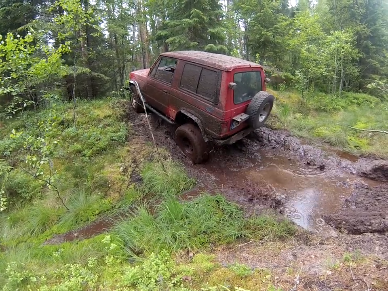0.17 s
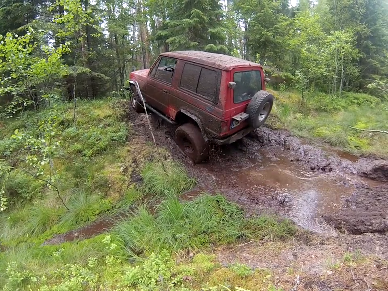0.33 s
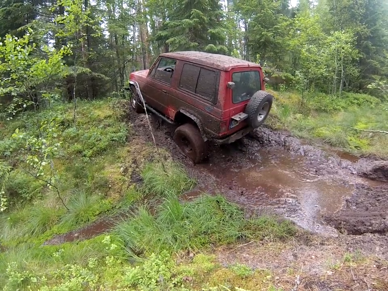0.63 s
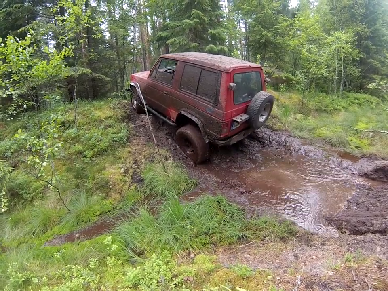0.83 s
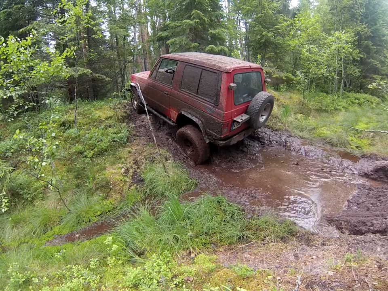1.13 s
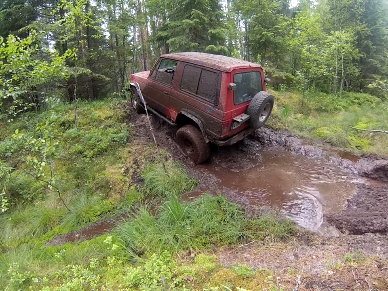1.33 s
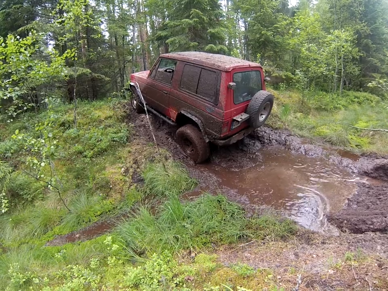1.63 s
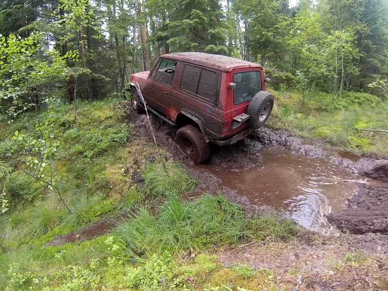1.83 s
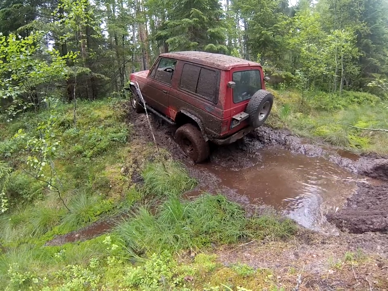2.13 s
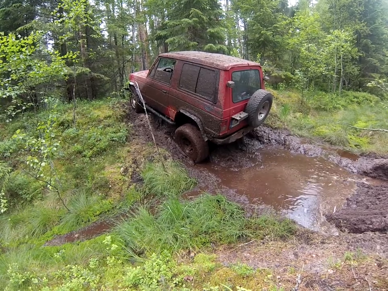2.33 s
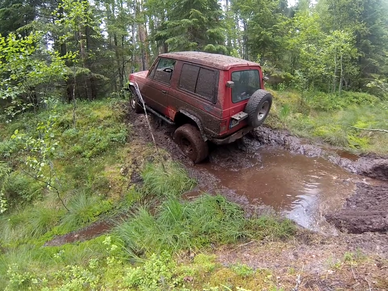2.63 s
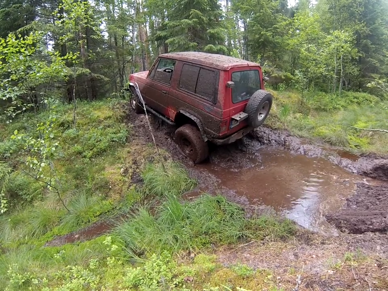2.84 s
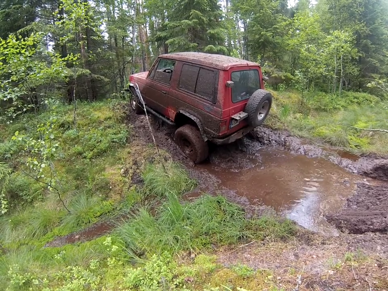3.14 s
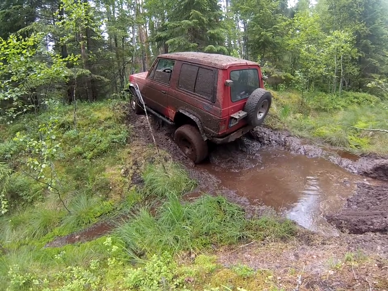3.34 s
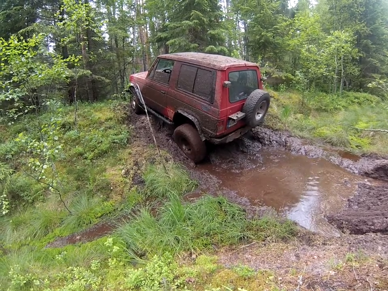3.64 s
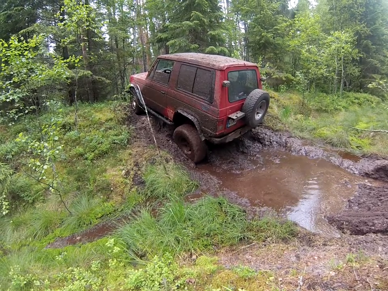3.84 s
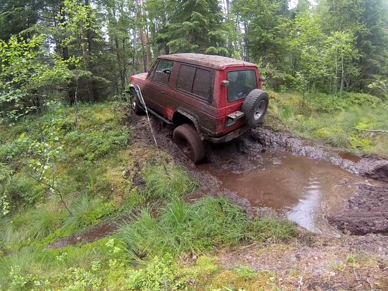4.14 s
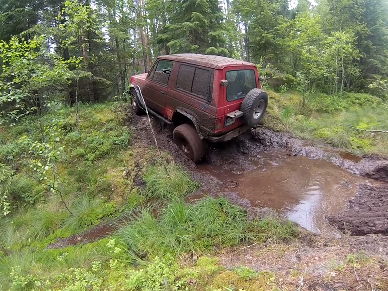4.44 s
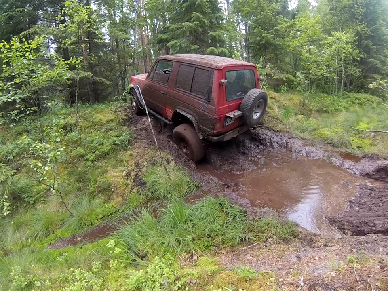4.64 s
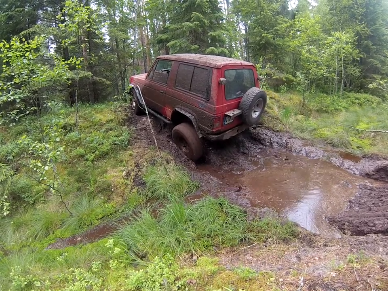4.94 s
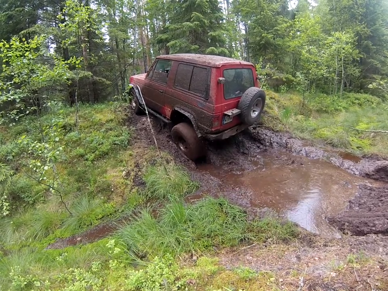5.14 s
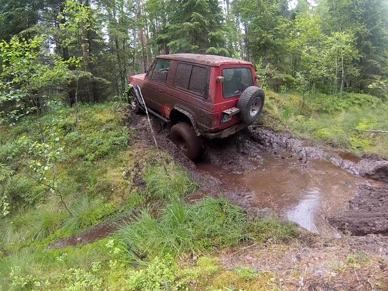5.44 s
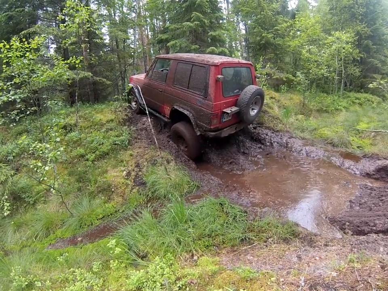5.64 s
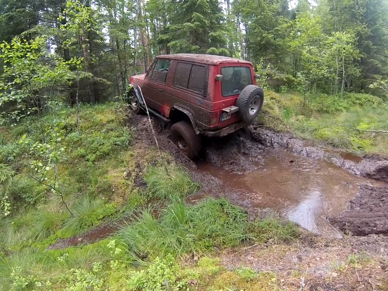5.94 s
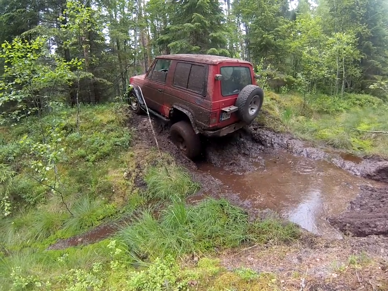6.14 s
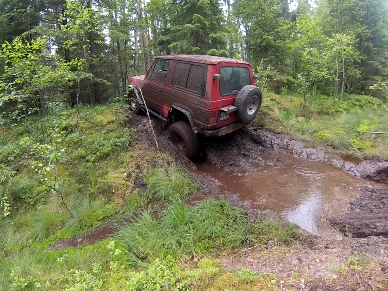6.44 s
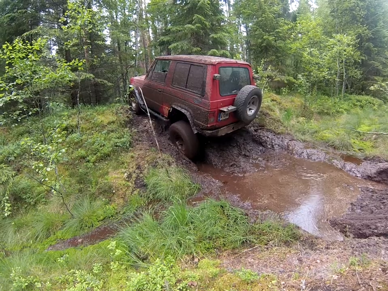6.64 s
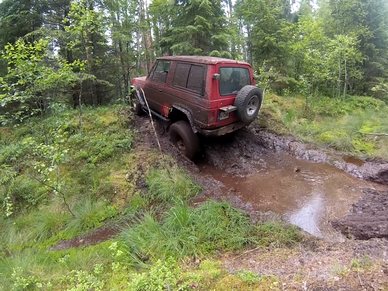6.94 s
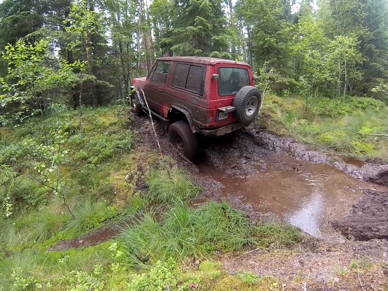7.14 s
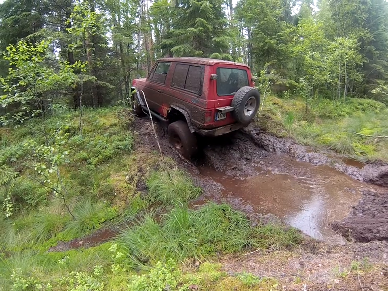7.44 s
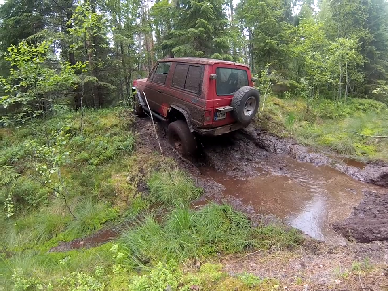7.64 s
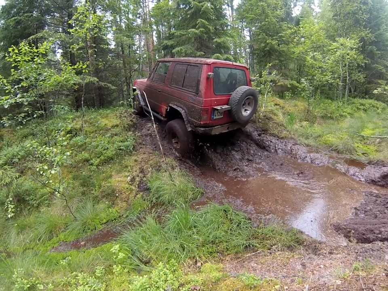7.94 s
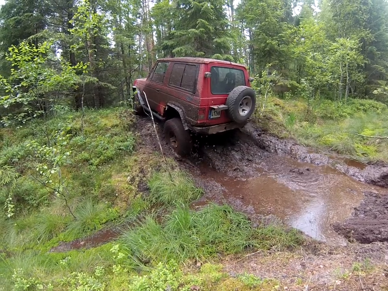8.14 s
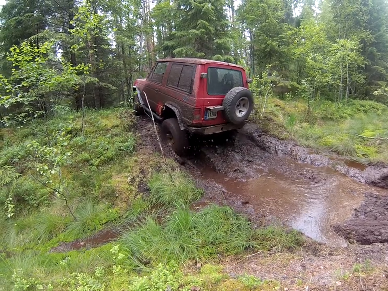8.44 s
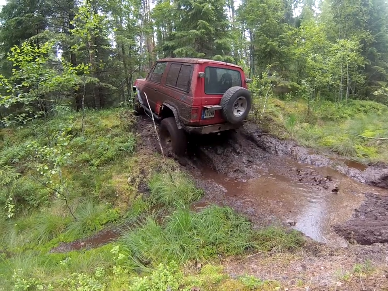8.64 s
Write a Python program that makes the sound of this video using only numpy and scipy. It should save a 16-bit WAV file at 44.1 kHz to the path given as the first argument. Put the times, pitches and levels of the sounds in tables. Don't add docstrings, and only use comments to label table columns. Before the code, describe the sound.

A four-wheel-drive a few metres away struggles in a forest mud hole. Its engine surges with a raspy exhaust, then bogs down almost to a stall while clods plop and grit ticks on panels. It picks up again, labours steadily, pops in the tail pipe as more mud lands, then revs fastest at the end. Light wind thumps the single microphone over faint leaf hiss.

```python
import sys
import numpy as np
from scipy import signal
from scipy.fft import rfft, irfft
from scipy.io import wavfile
from scipy.ndimage import uniform_filter1d

SR = 44100
rng = np.random.default_rng(int(sys.argv[2]) if len(sys.argv) > 2 else 0)


def ratio_of_db(decibels):
    return 10 ** (np.asarray(decibels, float) / 20)


def digitize_waveform(pressure):
    field = np.atleast_2d(pressure).T
    bounded = np.clip(field, -1, 1)
    quanta = np.round(bounded * 32767).astype(np.int16)
    wavfile.write(sys.argv[1], SR, quanta)


N = 387192

# frequency_hz, density_db (per Hz)
FOREST_SPECTRUM = [(140, -28), (230, -3), (769, -13.5), (1070, -14.5), (2080, -18), (2440, -16.5),
                   (3230, -21), (5850, -23.5), (15000, -31.5)]
FOREST_DB = -65
WHINE_HZ, WHINE_DB = 12330, -88

# frequency_hz, density_db (per Hz)
GUST_SPECTRUM = [(3, 6), (8, -1.5), (16, 1), (27, -5.5), (40, -9.5), (70, -10), (120, -20), (300, -54)]
# time_s, level_db
WIND_LEVEL = [(0, -42.5), (.9, -45), (1.2, -45), (1.9, -44), (2.15, -45.5), (2.8, -46.5), (3.1, -46.5),
              (8.3, -43.5), (8.78, -50)]
# time_s, peak_db, pitch_hz, way (+1 suction first, -1 push first)
WIND_THUMPS = [
    (1.109, -34.5, 72, 1),
    (1.591, -55, 64, 1),
    (1.089, -34, 29, 1),
    (1.616, -32, 42, -1),
    (1.932, -37, 39, -1),
    (2.449, -39, 22, 1),
    (3.799, -34, 55, 1),
    (4.29, -37, 27, -1),
    (4.866, -34, 43, -1),
]
BREEZE_DB, BUFFET_HZ, BUFFET_FOLLOWS = -45, 55, 2.5

# time_s, peak_db, pitch_hz, t60_s
MUD_CLODS = [(1.308, -34.5, 270, 0.026), (1.309, -56, 900, 0.017), (1.411, -50.5, 745, 0.021),
             (1.478, -49.5, 700, 0.016), (1.512, -57, 5600, 0.013), (1.572, -64, 5900, .03),
             (1.608, -60, 782, 0.025), (2.021, -41, 812, 0.017), (2.330, -64, 2450, 0.027),
             (2.597, -65, 2260, 0.037), (2.625, -64, 2400, 0.028), (2.640, -66, 2250, 0.055),
             (6.035, -37.5, 570, .015), (6.057, -41, 530, 0.013)]
# time_s, peak_db, t60_s
GRIT_TICKS = [
    (1.512, -60, .02),
    (2.020, -36, 0.058),
    (2.277, -57, 0.039),
    (2.557, -50, 0.032),
    (2.597, -49, 0.032),
    (2.625, -53, .04),
]
# frequency_hz, width_hz, level_db
PANEL_MODES = [(560, 200, -14), (810, 200, -2), (1650, 220, -6.5), (2400, 170, 0), (3740, 620, -13),
               (4540, 580, -11), (6560, 1200, -15.5), (8870, 3700, -22)]

# time_s, firing_rate (firings per s)
ENGINE_SPEED = [(.17, 70), (.74, 88), (1.75, 42), (2.2, 29), (2.83, 23), (3.1, 52), (3.42, 65),
                (3.85, 62.5), (4.3, 71), (5.33, 71.5), (5.6, 62), (5.97, 61), (6.72, 77), (7.1, 67),
                (7.75, 88.5), (8.1, 107), (8.32, 97), (8.5, 80.5)]
# time_s, level_db
THROTTLE_HISS = [(0, -58), (.18, -51.5), (.45, -49.5), (.65, -55), (.73, -64), (1.6, -78.5), (2.82, -82.5),
                 (3.02, -64.5), (3.5, -55.5), (4.2, -53), (5.6, -57), (6.6, -55), (6.95, -58), (7.2, -51.5),
                 (8.04, -43.5), (8.22, -56.5), (8.5, -59.5), (8.64, -51.5)]
# time_s, level_db
PULSE_PRESSURE = [(0, -5.5), (.3, 2.5), (.66, 0.5), (.79, -23), (.88, 13.5), (1.1, -14.5), (1.6, -6),
                  (2.4, -29), (2.72, -28), (2.84, -1), (3.9, 0), (4.6, -4), (6.3, -0.5), (6.92, -2.5),
                  (7.5, 1.5), (8.25, 10.5), (8.5, -11), (8.63, 1.5)]
# time_s, strain_db
WHEEL_STRAIN = [(0, 0.5), (.5, -1.5), (.85, 2.5), (2.92, 2), (3.5, -3), (5.0, 2.5), (5.6, 0.5), (6.75, 2.5),
                (7.2, -2.5), (8.25, 0.5)]
# time_s, length_s, rise_db
TYRE_BITES = [(.38, 0.18, 4), (0.683, 0.064, 4.5), (0.917, 0.098, 13), (1.363, 0.23, 9.5),
              (3.014, 0.079, 2), (4.188, 0.071, 3.5), (5.08, 0.087, 3), (6.523, 0.12, 3.5), (6.76, 0.1, 13),
              (7.89, 0.06, 11), (8.106, .05, 12.5)]
# level_db (middle throttle), throttle_share, strain_share, bite_share
PART_LEVELS = [
    (-61.5, 0.58, 0.1, 0.66),
    (-60, 0.65, 0.11, 0.34),
    (-57.5, 0.92, 1.18, 0.1),
    (-54, 0.65, 1, 0.077),
]
CRUISE_DB, CRUISE_RATE = -56, 70
FLYWHEEL_S = .08

# frequency_hz, width_hz, level_db
DOWN_PIPE_MODES = [(495, 36, -4.5), (634, 45, 0.5), (893, 64, 1), (987, 85, -1.5), (1060, 78, -2.5)]
SING_DB, SING_RATE, SING_DB_PER_RATE, SING_FOLLOWS = -57.5, 89, 1.87, 0.72

# time_s, peak_db, pitch_hz
MISFIRES = [
    (5.996, -36, 192),
    (6.0377, -26, 234),
    (6.0593, -26, 221),
    (6.254, -33, 200),
]

# frequency_hz, width_hz, level_db
PIPE_MODES = [(398, 35.5, -2.5), (463, 48, -2.5), (607, 82, -2)]
# frequency_hz, width_hz, level_db
HEADER_MODES = [(864, 47, -6), (912, 157, -9.5), (1051, 54, -4), (1086.4, 25.3, 1), (1157, 73, -8),
                (1304, 96, -14)]
# frequency_hz, width_hz, level_db
BLOCK_MODES = [(1550, 177, -1), (1800, 115, -4), (2153, 44, 5.5), (2250, 49, 7), (2458, 360, 1.5),
               (2650, 51, -12), (2966, 51, -14), (3240, 130, -9.5)]
# frequency_hz, width_hz, level_db
JET_MODES = [(3530, 240, -8.5), (4340, 770, -6), (4680, 610, -2.5), (5600, 210, 2)]
# frequency_hz, width_hz, level_db
JET_TOP_MODES = [(6130, 55, -13.5), (6865, 286, -3), (8060, 580, -11), (9650, 180, -12), (11000, 700, -20)]
# frequency_hz, density_db (per Hz)
JET_SPECTRUM = [(5500, -46), (6300, -9), (7500, -22), (10000, -22), (15000, -26)]
# frequency_hz, width_hz, level_db
LIP_MODES = [(5300, 260, 1.5), (5970, 440, 0)]
# frequency_hz, width_hz, level_db
WHISTLE_TONES = [(5230, 130, -6), (5350, 120, -5), (5810, 220, -3), (6020, 200, 0)]
WHISTLE_DB, WHISTLE_FOLLOWS, WHISTLE_STRAIN = -2.8, .15, -.3
CLEAN_DB, CLEAN_DB_PER_RATE = -9, .38

# level_db, pressure_share, throttle_share
LOW_ORDER_LEVELS = [
    (-51.5, .15, 0.94),
    (-43, 0.82, 0.11),
    (-51.5, 0.44, .02),
    (-48.5, 0.64, .02),
]
# frequency_hz, level_db, pressure_share (small: rings on at low pressure)
LOW_PIPE_RESPONSE = [(40, -6.5, 0.77), (126, -0.5, 1.5), (140.8, -2, 0.84), (190.6, 6.5, .02),
                     (218.8, -1, 1.3), (250, -6.5, 0.87), (288.7, -3, 0.95), (344, -24.5, 0.55)]
# frequency_hz, level_db (re low orders)
TAIL_PIPE_RESPONSE = [(100, -19), (150, -19), (185, 0.5), (220, -25), (310, -18.5), (335, -36), (400, -75)]
SHUT_DB = -5
UNEVEN_DB, UNEVEN_GROWS = .6, .2


def rms_one(x):
    return x / np.sqrt(np.mean(x ** 2) + 1e-20)


def in_time(rows):
    s, *columns = np.transpose(rows)
    return [np.interp(np.arange(N) / SR, s, c) for c in columns]


def drift(rate):
    r = np.exp(-40 * np.pi * rate / SR)
    chance = rng.standard_normal(N // 20 + 2002)
    slow = signal.lfilter([1], [1, -2 * r, r * r], chance)[2000:]
    return np.interp(np.arange(N) / 20, np.arange(len(slow)), rms_one(slow))


def coloured(x, spectrum):
    hz, db = np.transpose(spectrum)
    grid = np.maximum(np.arange(N // 2 + 1) * SR / N, 1)
    gain_db = np.interp(np.log(grid), np.log(hz), db, left=-90)
    return irfft(rfft(x) * ratio_of_db(gain_db), N)


def resonances(x, modes, patchy_db=0):
    out = 0
    for k, (hz, width, db) in enumerate(modes):
        r = np.exp(-np.pi * width / SR)
        feed = (1 - r * r) / 2 * np.array([1, 0, -1])
        rung = signal.lfilter(feed, [1, -2 * r * np.cos(2 * np.pi * hz / SR), r * r], x)
        out = out + (-1) ** k * ratio_of_db(db + patchy_db * drift(2.7)) * rung
    return out


def band(x, low_hz, high_hz, order=2):
    return signal.sosfilt(signal.butter(order, [low_hz, high_hz], "band", fs=SR, output="sos"), x)


def add(out, s, db, hz, shape):
    cycle = np.arange(-1.5, 1.5, hz / SR)
    at = round(s * SR) - len(cycle) // 2
    out[at:at + len(cycle)] += ratio_of_db(db) * shape(2 * np.pi * cycle) * np.exp(-(cycle / 0.73) ** 2)


def forest():
    hiss = rms_one(coloured(rng.standard_normal(N), FOREST_SPECTRUM))
    whine = np.sin(2 * np.pi * WHINE_HZ * np.arange(N) / SR)
    return hiss * ratio_of_db(FOREST_DB + .3 * drift(40)) + ratio_of_db(WHINE_DB) * whine


def wind():
    lumps = coloured(rng.standard_normal(N), GUST_SPECTRUM) * ratio_of_db(1.9 * drift(3.9))
    level_db = in_time(WIND_LEVEL)[0]
    buffeting = band(lumps, BUFFET_HZ, 400)
    lumps = lumps + buffeting * (ratio_of_db(BUFFET_FOLLOWS * np.minimum(level_db - BREEZE_DB, 0)) - 1)
    out = ratio_of_db(level_db) * rms_one(lumps)
    for s, db, hz, way in WIND_THUMPS:
        add(out, s, db, hz, lambda turn: np.sign(way) * np.sin(turn))
    return out


def mud():
    out, grit, t = np.zeros(N), np.full(N, 1e-18), np.arange(SR // 8) / SR
    for s, db, hz, t60 in MUD_CLODS:
        at = round(s * SR)
        soft_start = 1 - np.exp(-t * hz * 2.0)
        out[at:at + len(t)] += ratio_of_db(db - 60 * t / t60) * soft_start * np.sin(2 * np.pi * hz * t) * 2
    for s, db, t60 in GRIT_TICKS:
        at = round(s * SR)
        grit[at:at + len(t)] += ratio_of_db(db - 60 * t / t60) * rng.standard_normal(len(t))
    return out + ratio_of_db(7.0) * resonances(grit, PANEL_MODES)


def speed():
    return uniform_filter1d(in_time(ENGINE_SPEED)[0], int(FLYWHEEL_S * SR), mode="nearest")


def throttle():
    return in_time(THROTTLE_HISS)[0] - CRUISE_DB


def load():
    t, opening, strain = np.arange(N) / SR, throttle(), in_time(WHEEL_STRAIN)[0]
    bite = sum(db * np.exp(-((t - s) / length) ** 2) for s, length, db in TYRE_BITES)
    return [db + a * opening + b * strain + c * bite for db, a, b, c in PART_LEVELS]


def firing():
    count = np.cumsum(speed()) / SR
    chance = rng.standard_normal(2000)
    return count, np.interp(count, np.arange(2000), chance)


def puffs(count, strength, depth, sharp):
    gate = 1 - depth + depth * sharp * np.exp(-sharp * (count % 1))
    return rng.standard_normal(N) * gate * ratio_of_db(strength)


def pulses(count, strength):
    wobble = .009 * drift(25)
    return ratio_of_db(0.5 * strength) * sum(np.cos(2 * np.pi * k * (count + wobble)) for k in range(4, 15))


def down_pipe(count, strength):
    flow = rms_one(puffs(count, strength, .3, 1.5)) + ratio_of_db(-11) * rms_one(pulses(count, strength))
    shortfall = np.minimum(speed() - SING_RATE, 0)
    level_db = SING_DB + SING_DB_PER_RATE * shortfall + SING_FOLLOWS * throttle()
    return ratio_of_db(level_db) * rms_one(resonances(flow, DOWN_PIPE_MODES, 1.0))


def misfires():
    out = np.zeros(N)
    for s, db, hz in MISFIRES:
        add(out, s, db, hz, lambda turn: -np.cos(turn))
    return out


def rumble(count, strength):
    gas = puffs(count, strength, .3, 1.5)
    return ratio_of_db(load()[3]) * rms_one(band(gas, 92, 272, order=4))


def outlet_hiss(count, strength):
    gas = puffs(count, 0.66 * strength, 0.27, 1.6)
    jet = rms_one(band(resonances(gas, JET_MODES, 1.0), 3160, 5270))
    top = band(resonances(gas, JET_TOP_MODES, 1.0), 5200, 16100) + coloured(gas, JET_SPECTRUM)
    lips = resonances(puffs(count, .6 * strength, .3, 1.8), LIP_MODES)
    whistle = rms_one(band(resonances(lips, WHISTLE_TONES, .5), 5100, 6200, order=3))
    share_db = WHISTLE_DB + WHISTLE_FOLLOWS * throttle() + WHISTLE_STRAIN * in_time(WHEEL_STRAIN)[0]
    share = np.minimum(ratio_of_db(share_db), .96)
    return share * whistle + np.sqrt(1 - share ** 2) * jet + ratio_of_db(-8.5) * rms_one(top)


def engine_noise(count, strength):
    clean = ratio_of_db(CLEAN_DB + CLEAN_DB_PER_RATE * np.maximum(speed() - CRUISE_RATE, 0))
    roar = rms_one(puffs(count, 1.0 * strength, 0.22, 1.1))
    drone = rms_one(pulses(count, strength))
    flow = (roar + ratio_of_db(-11) * clean * drone) / np.sqrt(1 + clean ** 2)
    pipe = band(resonances(flow, PIPE_MODES, 1.0), 400, 910)
    header_flow = flow + ratio_of_db(0.5) * puffs(count, strength, 0.12, 0.63)
    header = band(resonances(header_flow, HEADER_MODES, 0.18), 680, 2160)
    knock = puffs(count, 1.2 * strength, 0.19, 1.4)
    block = band(resonances(knock, BLOCK_MODES, 1.0), 1500, 3300)
    parts = [pipe, header, block, outlet_hiss(count, strength)]
    levels = load()[:3] + in_time(THROTTLE_HISS)
    throb = .5 * drift(30)
    return sum(ratio_of_db(db + throb) * rms_one(x) for db, x in zip(levels, parts))


def low_orders(rate):
    pressure = in_time(PULSE_PRESSURE)[0]
    opening = np.maximum(throttle(), SHUT_DB)
    hz, pipe_db, share = np.transpose(LOW_PIPE_RESPONSE)
    waver_db = UNEVEN_DB + UNEVEN_GROWS * np.maximum(-pressure, 0)
    levels = []
    for k, (db, a, b) in enumerate(LOW_ORDER_LEVELS, 1):
        pipe = np.interp(k * rate, hz, pipe_db)
        push = a * pressure * np.interp(k * rate, hz, share)
        levels.append(db + b * opening + pipe + push + waver_db * drift(4.5))
    return levels


def exhaust(count, strength):
    rate = speed()
    levels = low_orders(rate)
    hz, db = np.transpose(TAIL_PIPE_RESPONSE)
    low_db = 10 * np.log10(sum(ratio_of_db(2 * level) for level in levels[1:]))
    load_db = 0.46 * (np.clip(load()[0], -76, -60) + 64)
    upper = [low_db + load_db + np.interp(k * rate, hz, db) for k in range(5, 10)]
    wobble = .007 * drift(25)
    phases = [2 * np.pi * k * (count + wobble) - .4 * (k - 3) ** 2 for k in range(1, 10)]
    tone = -sum(ratio_of_db(level) * np.cos(phase) for level, phase in zip(levels + upper, phases))
    return np.sqrt(2) * tone * ratio_of_db(.7 * strength)


def scene():
    count, strength = firing()
    surroundings = forest() + wind() + mud()
    vehicle = down_pipe(count, strength) + misfires() + rumble(count, strength)
    vehicle = vehicle + engine_noise(count, strength) + exhaust(count, strength)
    mono = surroundings + vehicle
    return np.array([mono, mono])


def roll_off(x):
    return signal.sosfilt(signal.butter(12, 15180, fs=SR, output="sos"), x)


def record(dry):
    side = ratio_of_db(-85) * rms_one(band(rng.standard_normal(N), 6000, 14500))
    late = np.roll(dry[0], SR // 20)
    side = side + ratio_of_db(-33) * band(late, 600, 6200)
    mix = dry + side * [[1], [-1]]
    return roll_off(mix)


dry = scene()
out = record(dry)
digitize_waveform(out)
```